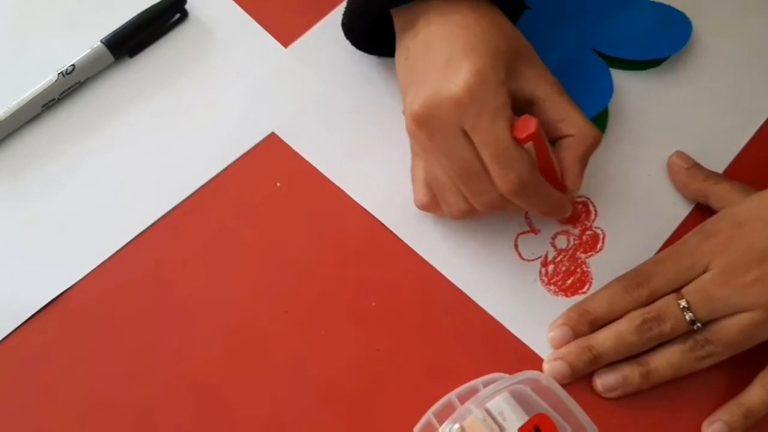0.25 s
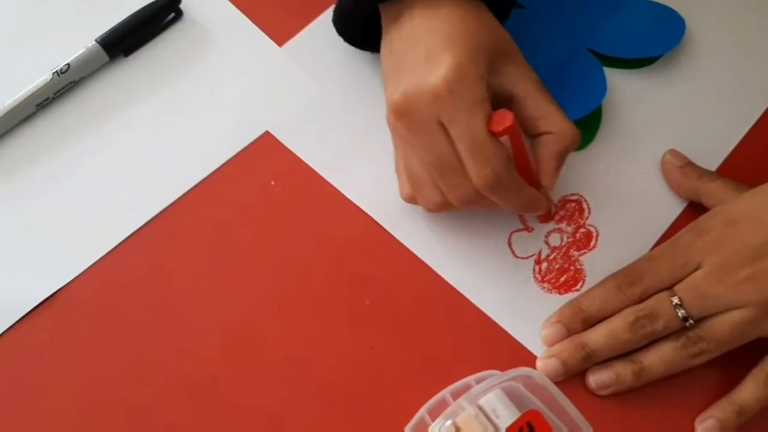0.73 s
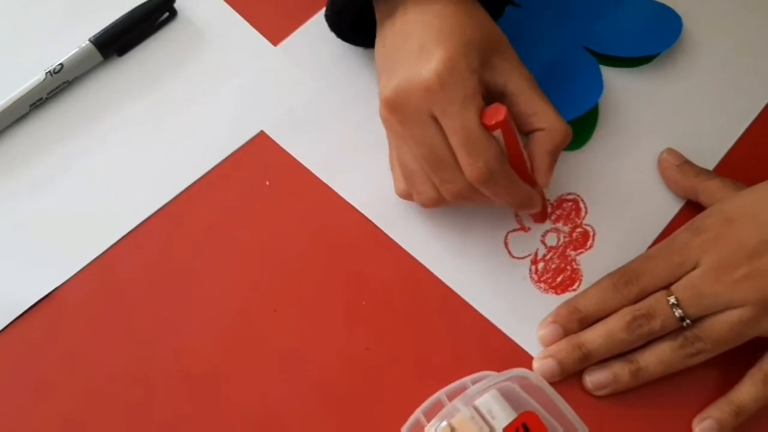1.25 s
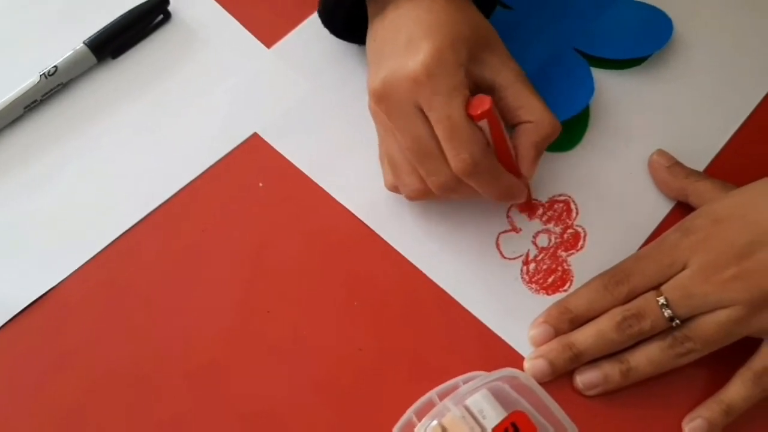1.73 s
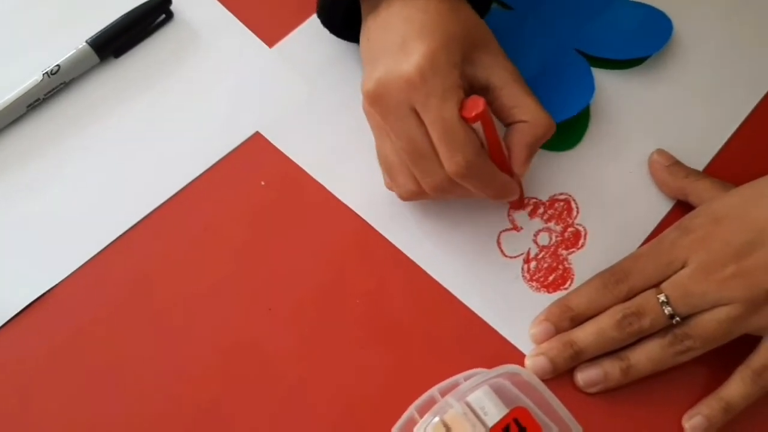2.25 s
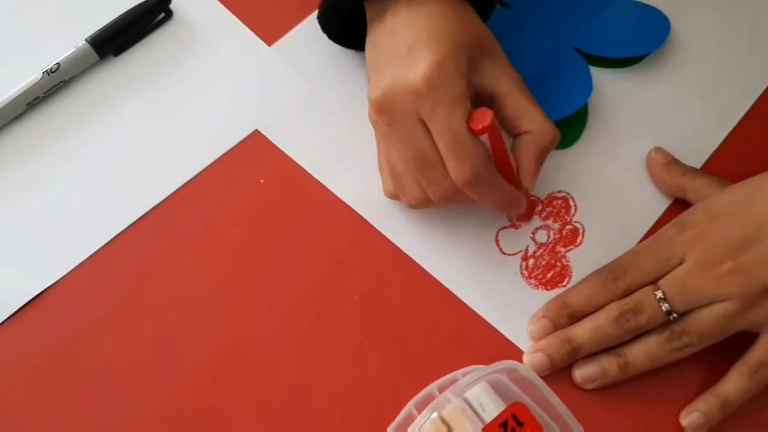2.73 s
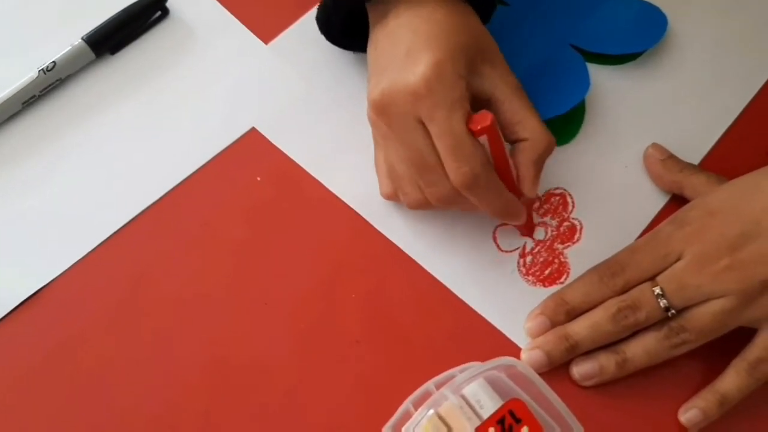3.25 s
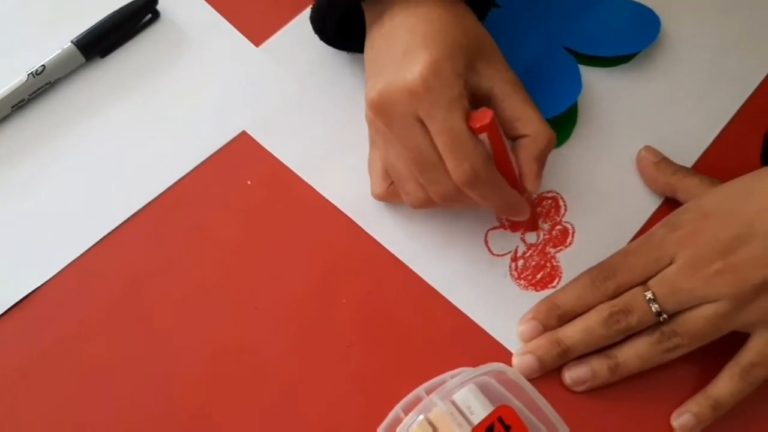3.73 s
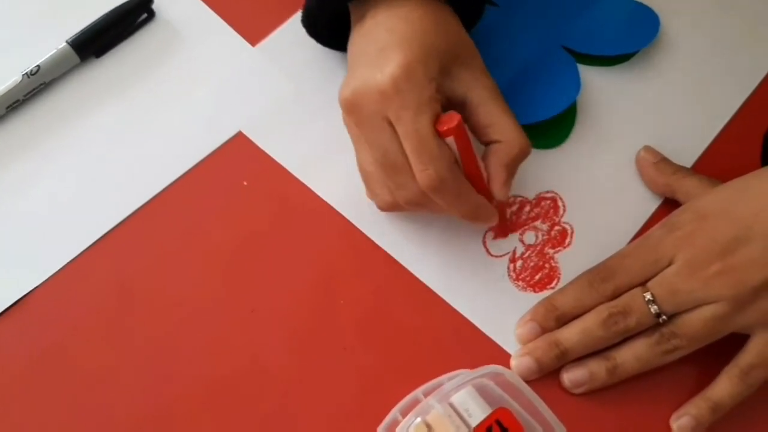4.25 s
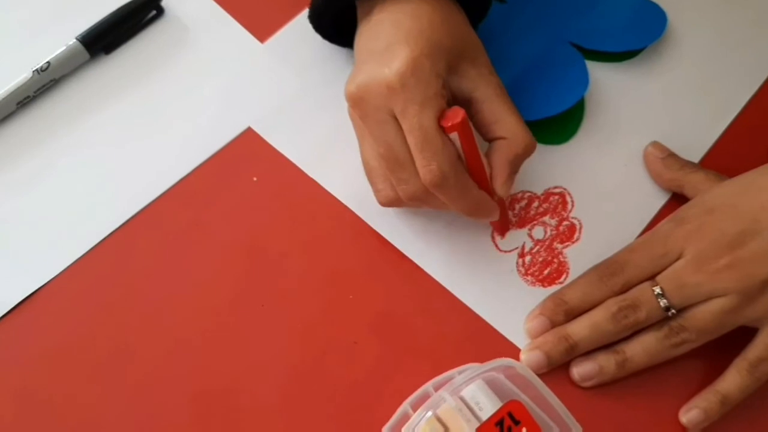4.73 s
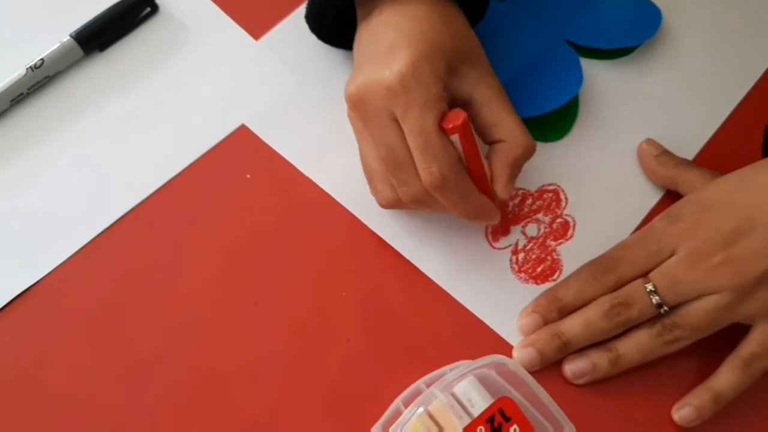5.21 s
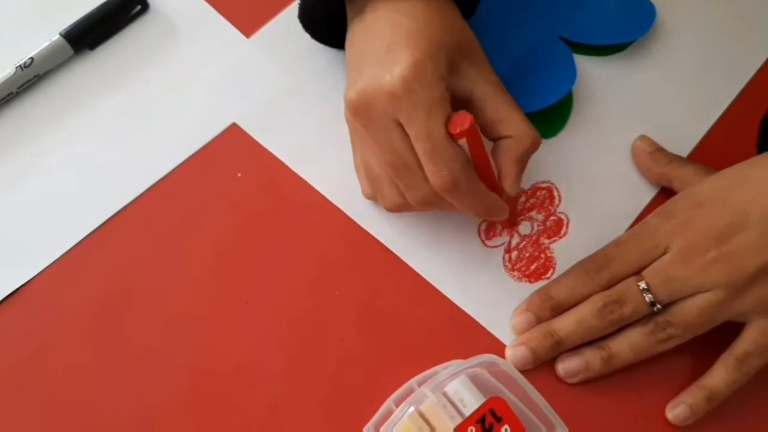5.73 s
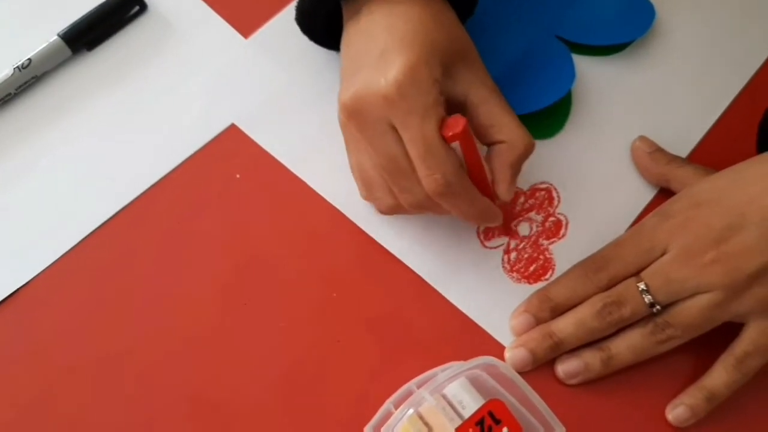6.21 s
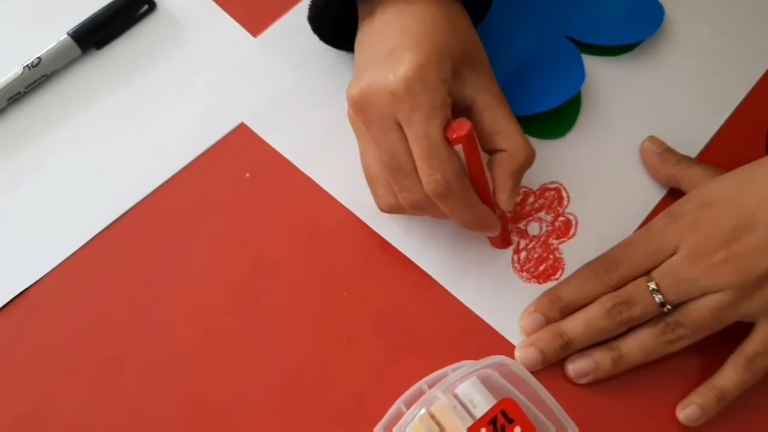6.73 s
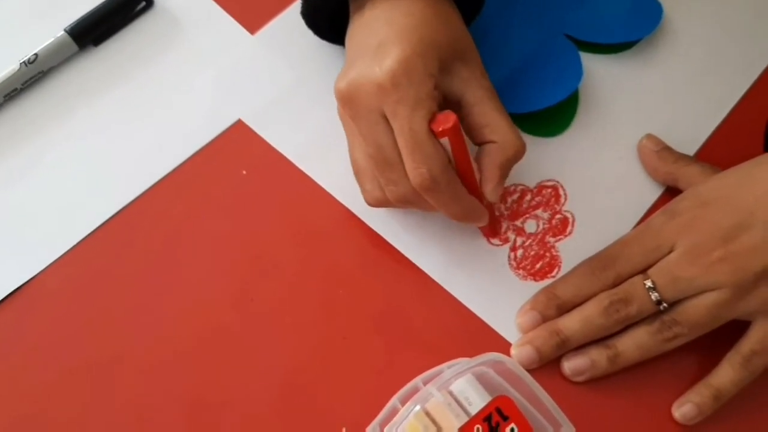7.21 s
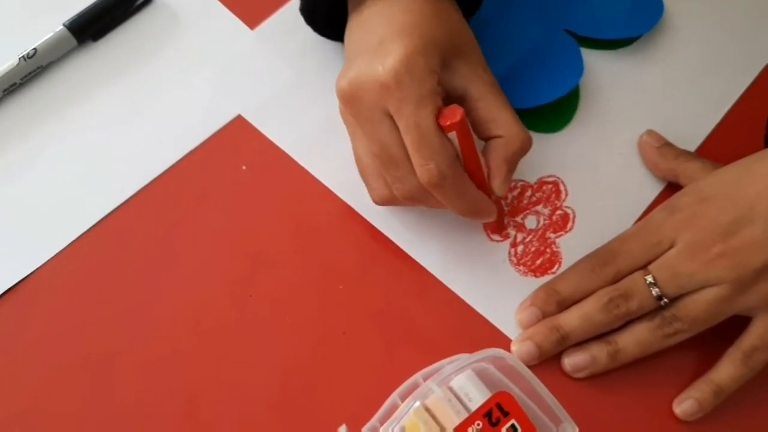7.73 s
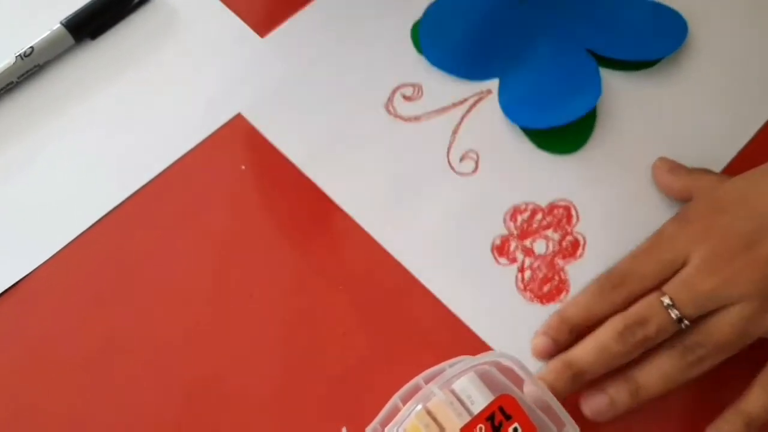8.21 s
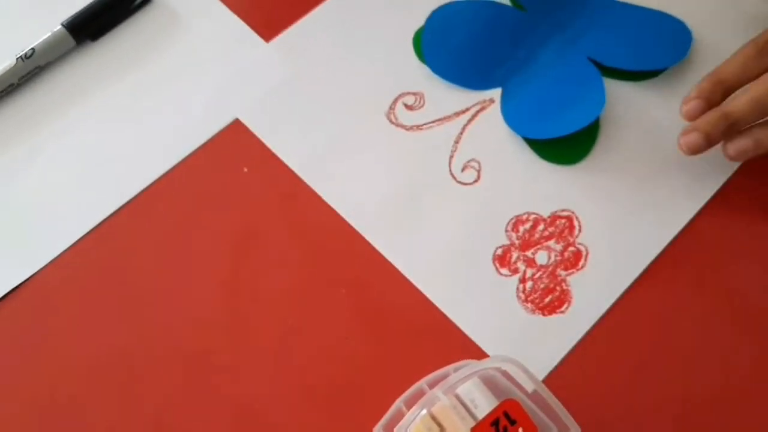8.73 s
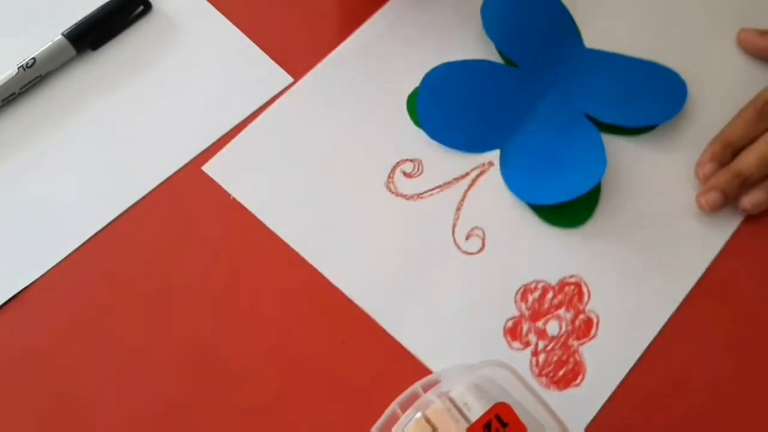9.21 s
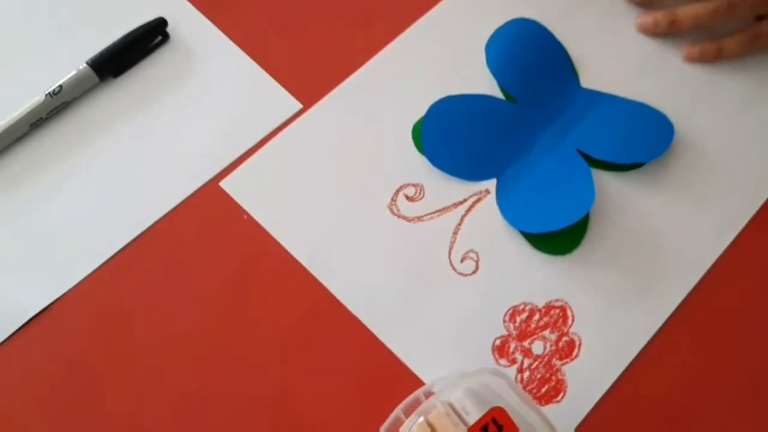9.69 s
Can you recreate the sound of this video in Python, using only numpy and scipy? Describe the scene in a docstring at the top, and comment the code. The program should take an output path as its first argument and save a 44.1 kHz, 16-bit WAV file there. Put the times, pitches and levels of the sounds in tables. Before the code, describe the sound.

Close stereo pickup at a table in a small room: fast, grainy crayon rasping in bouts, with faint squeaky skids and soft hand rubbing. Then the hand brushes off the sheet, paper swishes hollowly, and a single hard object clicks sharply on the right with a short room echo. Beneath it, dull traffic rumble, faint hiss and a low engine drone that swells late.

```python
'''A wax crayon fills in a small flower on paper, about nine strokes a second, on a table in a small room:
noise and resonances swell with each stroke, and random ticks are specks of wax snapping off.
The drawing hand rubs on the sheet and brushes off it; the sheet slides with a hollow swish (noise bands),
and something hard clicks once on the table (decaying tones and echoes). Outside, an engine hums
(four sine waves) and grows louder over dull traffic noise; a faint hiss stays throughout.'''
import sys
import numpy as np
from scipy import signal
from scipy.fft import rfft, irfft, next_fast_len
from scipy.io import wavfile

SR = 44100
rng = np.random.default_rng(int(sys.argv[2]) if len(sys.argv) > 2 else 0)


def pcm_store(signal):
    """Save signal as 16-bit PCM."""
    levels = np.round(np.clip(np.atleast_2d(signal), -1, 1) * 32767)
    wavfile.write(sys.argv[1], SR, levels.astype(np.int16).T)


N = 439236
TIME = np.arange(N) / SR   # seconds
# spacing of the peaks left by reflections in the room, and close to the sheet
RIPPLE_STEP_HZ, SHEET_STEP_HZ = 69.84, 261
COLOUR_CHANGES_PER_S = 9   # how often the tip meets the paper a little differently
CATCHES_PER_S = 370   # how often sliding contacts catch on the fibres


def crayon(wax_db=2.5, crumb_db=-9.0, turn_speed=0.17, sharpness=0.82, tooth_db=0.86,
           ring_speed_follow=0.99, ring_force_follow=0.67, colour_db=2.5, rub_db=-0.86, rub_follow=0.1):
    """The tip is fast in mid stroke and slow at each turn; heavy strokes rasp, light ones still ring."""
    # Wax dragging over paper fibres. Each row: frequency in Hz, relative level in dB per Hz.
    wax_colour = [(1000, -1), (3100, 6.5), (4800, -4.5), (6800, -1.5), (8700, 3), (12300, -9.5),
                  (15000, -2.5)]
    # Resonances of crayon and sheet. Each row: frequency in Hz, width in Hz, relative level in dB,
    # left minus right in dB.
    tip_modes = [(1359, 55, 3, -6), (1824, 80, -0.5, -17), (2685, 250, 2.5, -13.5), (10220, 260, -5, 14),
                 (10810, 840, -6, 14)]
    # Hand rubbing on the sheet. Each row: frequency in Hz, relative level in dB per Hz.
    rub_colour = [(750, 0), (1280, 3.5), (2100, -2.5), (2600, -1), (3200, -6.5), (4800, -17),
                  (13000, -22.5)]
    # How hard the hand rubs. Each row: time in seconds, level in dB before the rub_db trim.
    pressure = [(.3, -67), (.7, -64), (1.0, -55.5), (1.45, -57.5), (1.65, -76.5), (1.93, -79), (2.1, -59.5),
                (2.7, -59.5), (3.5, -61.5), (3.8, -72), (5.2, -76), (5.6, -59), (6.0, -58.5), (6.3, -69)]

    s, stroke_db = strokes()
    # the stroke count is whole at full speed and halfway between at the turns
    stroke = np.interp(TIME, np.r_[0, s, 2 * s[-1] - s[-2]], np.arange(-1, len(s) + 1))
    swing = np.abs(np.cos(np.pi * stroke)) ** (2 * sharpness)
    speed = turn_speed + (1 - turn_speed) * swing
    on_paper = np.clip(2 * (len(s) - .3 - stroke), 0, 1)   # fades out after the last stroke
    usual_db = np.median(stroke_db)
    force = from_db(np.interp(TIME, s, stroke_db) - usual_db)
    tooth = from_db(tooth_db * drift(rate=240))   # the paper's grain makes the drag uneven

    wax = from_db(wax_db) * moving(wax_colour, ripple_db=2.5, rate=COLOUR_CHANGES_PER_S,
                                   step_hz=SHEET_STEP_HZ)
    crumb_gain = from_db(crumb_db + colour_db * drift(COLOUR_CHANGES_PER_S))
    rasp = force * speed * (wax + crumb_gain * crumbs(speed))

    ring = 0
    for hz, width_hz, db, side_db in tip_modes:
        gain = from_db(db + colour_db * drift(COLOUR_CHANGES_PER_S))
        ring = ring + gain * pan(side_db) * resonant_noise(hz, width_hz)
    ring = force ** ring_force_follow * speed ** ring_speed_follow * ring

    rub_gain = from_db(in_time(pressure)[0] + rub_db) * speed ** rub_follow
    rub = rub_gain * moving(rub_colour, ripple_db=6.5, rate=5)
    return on_paper * tooth * (from_db(usual_db) * (rasp + ring) + rub)


def strokes():
    """Time of full speed for each stroke in seconds, and its level in dB."""
    # Bouts of even back-and-forth scribbling. Each row: first stroke in seconds,
    # last stroke in seconds, number of strokes.
    bouts = [(.232, 1.891, 16), (2.012, 3.479, 14), (3.635, 3.815, 2), (3.932, 5.5, 14), (5.63, 6.085, 5),
             (6.32, 6.43, 2), (6.535, 7.093, 6)]
    # How heavy each stroke is, bout after bout. Each entry: level in dB.
    levels_db = [-80.5, -76.5, -74, -69, -74.5, -70, -70.5, -71, -73.5, -71, -67, -72, -69.5, -75.5, -72,
                 -75.5, -68.5, -71.5, -65.5, -66, -64.5, -68, -64.5, -67.5, -66, -67.5, -69, -71.5, -79,
                 -73, -72.5, -76, -72, -71.5, -74.5, -71.5, -79, -72, -76.5, -70.5, -69, -70, -69, -67,
                 -65.5, -67.5, -77, -68, -71, -72, -86, -85, -99, -71, -78, -77, -82, -78, -73.5]
    times = [np.linspace(first, last, count) for first, last, count in bouts]
    return np.concatenate(times), levels_db


def crumbs(speed, low_hz=3000, high_hz=14000, per_s=500, spread_db=3):
    """Specks of wax snap off on the fibres, more often when the tip is fast; rms 1."""
    sizes = from_db(spread_db * np.minimum(rng.exponential(1, N), 4)) * rng.choice([-1, 1], (2, N))
    snaps = sizes * (rng.random(N) < per_s * speed / SR)   # per_s holds at full speed
    band = signal.butter(1, [low_hz, high_hz], "band", fs=SR, output="sos")
    return rms_one(signal.sosfilt(band, snaps))


def scuffs(side_db=-5.0, catch_db=1.0):
    """Brief bright skids and squeaks: the tip catches and lets go unevenly."""
    # Short scuffs on the sheet. Each row: peak time in seconds, rise in seconds, fall in seconds,
    # level in dB, centre in Hz, ratio of band edge to centre.
    skids = [(.44, 0.032, 0.01, -63, 2780, 1.22), (2.655, .015, .025, -56.5, 1800, 1.4),
             (5.274, 0.012, 0.0076, -58.5, 5200, 1.6), (5.3365, .001, 0.0095, -55, 4380, 1.1),
             (5.339, .0015, 0.0089, -55, 5250, 1.07), (5.342, 0.0055, 0.015, -60, 7600, 1.16),
             (5.742, 0.013, 0.015, -57.5, 5450, 1.34), (7.857, 0.003, 0.023, -58.5, 11500, 1.34)]
    out = np.zeros((2, N))
    for s, rise, fall, db, hz, ratio in skids:
        # bell-shaped rise, then an exponential fall
        swell = np.exp(-np.where(TIME < s, ((TIME - s) / rise) ** 2, (TIME - s) / fall) / 2)
        out += from_db(db) * swell * band_noise(hz / ratio, hz * ratio, N)
    return out * pan(side_db) * from_db(catch_db * drift(CATCHES_PER_S))


def slide(grain_db=1.9, hollow_hz=1780, hollow_width_hz=520, hollow_side_db=-4.0,
          attack_s=0.1, release_s=0.084):
    """Paper gliding: fluttering hiss with small catches, over the sheet's hollow resonance."""
    # Sliding paper. Each row: frequency in Hz, relative level in dB per Hz.
    paper = [(1800, 0.5), (4800, 1.5), (6700, -4), (8700, 2), (10000, -4), (15000, -5.5)]
    # Hand and sheet slide over the table. Each row: start in seconds, length in seconds,
    # hiss level in dB, hollow resonance level in dB.
    pushes = [(7.58, 0.68, -78.5, -64.5), (7.845, .04, -59, -68), (8.718, 0.35, -58, -59),
              (9.3, 0.16, -69.5, -67), (9.5, 0.27, -73, -54.5)]
    swish = moving(paper, ripple_db=3.3, rate=16, step_hz=SHEET_STEP_HZ)
    low_hz, high_hz = hollow_hz - hollow_width_hz / 2, hollow_hz + hollow_width_hz / 2
    hollow = pan(hollow_side_db) * band_noise(low_hz, high_hz, N)
    out = 0
    for s, length, hiss_db, hollow_db in pushes:
        # each push builds before its start, holds for its length and dies away
        before, after = np.minimum(TIME - s, 0), np.maximum(TIME - s - length, 0)
        push = np.exp(before / attack_s - after / release_s)
        out = out + push * (from_db(hiss_db) * swish + from_db(hollow_db) * hollow)
    return out * from_db(grain_db * drift(CATCHES_PER_S))


def click(crack_db=-10.5, snap_db=-23.5, snap_s=0.001, room_db=-14.0,
          early_gain=0.85, early_s=0.011, build_s=0.0003, wall_s=0.0264, wall_gain=0.82,
          near_side_db=-14.5, shadow_hz=700, room_side_db=-3.0):
    """A hard contact: a pressure swing, the struck thing's ring, scatter off the table, wall echoes."""
    # A light touch, then the blow. Each row: start in seconds, strength in dB.
    touches = [(8.9905, -22), (8.9914, 0)]
    # What it rings with. Each row: frequency in Hz, level in dB, time to fall by 60 dB in seconds.
    ring_modes = [(437, -33, 0.097), (582, -31, 0.21), (810, -31, 0.25), (1260, -34.5, 0.41),
                  (1495, -27.5, 0.24), (1593, -31, 0.3), (1863, -31, 0.25), (2500, -7.5, 0.018),
                  (3180, -14.5, 0.013), (7360, -47.5, 0.22), (11200, -45, 0.14), (11250, -19, 0.009)]
    t = np.arange(SR) / SR
    swing = (t - .0005) / .00013
    after = np.maximum(t - .0005, 0)   # seconds since contact
    direct = from_db(crack_db) * swing * np.exp((1 - swing ** 2) / 2)
    for hz, db, t60 in ring_modes:
        direct = direct + from_db(db - 60 * after / t60) * np.sin(2 * np.pi * hz * after)
    snap = (after > 0) * np.exp(-after / snap_s) * rng.standard_normal(len(t))
    direct = direct + from_db(snap_db) * snap   # the rough edges snap

    # only the bass bends round to the left, which hears it later
    bass = signal.sosfilt(signal.butter(1, shadow_hz, fs=SR, output="sos"), direct)
    left, right = bass + (direct - bass) * pan(near_side_db)
    near = np.array([np.interp(t - .00016, t, left, left=0), right])

    early = early_gain * np.exp(-after / early_s)
    walls = wall_gain * np.exp(-((t - wall_s) / 0.0033) ** 2)   # a bunch of wall echoes
    scatter = (1 - np.exp(-after / build_s)) * (1 + early + walls)
    blow = near + from_db(room_db) * scatter * room_tail(t) * pan(room_side_db)
    out = 0
    for s, db in touches:
        placed = [np.interp(TIME - s, t, port, left=0, right=0) for port in blow]
        out = out + from_db(db) * np.array(placed)
    return out


def room_tail(t):
    """Diffuse sound that dies at its own rate in each third of an octave."""
    # The room's answer to the click. Each row: frequency in Hz, relative level in dB per Hz,
    # time to fall by 60 dB in seconds.
    room = [(250, 1, 0.18), (483, 7.5, 0.29), (970, 0.5, 0.33), (1500, 3.5, 0.35), (2460, -1, 0.43),
            (3880, -10, 0.35), (5170, -27, 0.25), (15000, -23.5, 0.32)]
    edges = np.geomspace(180, 17000, 21)   # Hz
    tail = 0
    for low, high in zip(edges, edges[1:]):
        db, t60 = at_hz(room, np.sqrt(low * high))
        band = np.sqrt((high - low) / SR) * band_noise(low, high, len(t))
        tail = tail + from_db(db - 60 * t / t60) * band
    return tail


def engine(third_db=-9.5, waver=0.0017, flutter_db=2.0):
    """Only the four lowest harmonics of the firing rate come through the walls, each fading on its own."""
    # Engine speed. Each row: time in seconds, firings per second.
    firing = [(0, 56), (2.2, 57.4), (4.0, 55.2), (4.7, 57.3), (5.6, 57), (6.9, 56.6), (8.3, 54.4),
              (9.96, 56.3)]
    # Strength of the first, second and fourth harmonics. Each row: time in seconds, level in dB.
    fundamental = [(3.9, -62.5), (5.7, -57), (6.2, -48), (7.56, -52.5), (8.9, -41.5), (9.3, -51),
                   (9.96, -49)]
    second_harmonic = [(1.55, -57.5), (2.0, -50), (4.55, -64.5), (4.85, -49), (5.9, -59.5), (7.3, -52),
                       (7.52, -40), (8.2, -35), (8.86, -45.5), (9.1, -34.5), (9.33, -43), (9.6, -36.5),
                       (9.96, -40)]
    fourth_harmonic = [(4.0, -62), (4.2, -49.5), (4.6, -46.5), (5.15, -53), (5.64, -42.5), (6.08, -50),
                       (6.35, -42), (7.02, -40), (7.2, -53.5), (7.75, -42), (8.4, -38.5), (8.72, -55.5),
                       (8.98, -39.5), (9.65, -58.5), (9.92, -38.5)]
    tables = (firing, fundamental, second_harmonic, fourth_harmonic)
    rate, first, second, fourth = [in_time(rows)[0] for rows in tables]
    phase = 2 * np.pi * np.cumsum(rate * (1 + waver * drift(rate=14))) / SR
    levels = [first, second, fourth + third_db, fourth]   # the third follows the fourth
    sides_db = [1.5, 5.5, 3.0, 0.5]
    out = 0
    for k, (db, side_db) in enumerate(zip(levels, sides_db), start=1):
        tone = np.sin(k * phase + rng.uniform(0, 2 * np.pi))
        out = out + pan(side_db) * from_db(db + flutter_db * drift(rate=18)) * tone
    return out


def traffic(rumble_db=-49.5, rumble_follow=0.54, road_db=3.0, mode_db=-9.0, mode_follow=2.04,
            mode_hz=547, mode_width_hz=115, boom_low_hz=44, boom_high_hz=52):
    """As the street gets louder the rumble grows a little and the room's resonance a lot."""
    # Low rumble, then the rush. Each row: frequency in Hz, relative level in dB per Hz.
    rumble_colour = [(45, -11.5), (70, -3.5), (85, -5.5), (129, -8.5), (147, 1), (183, -11), (200, -1.5),
                     (240, 0.5), (330, -8.5), (480, -15.5), (620, -24.5), (2000, -65)]
    road_colour = [(680, 0.5), (1300, 1.5), (1900, 0), (3600, -14), (5200, -24), (8200, -23),
                   (12000, -34.5)]
    # Rush of the street. Each row: time in seconds, level in dB before the road_db trim.
    rush_levels = [(0, -64), (.35, -71), (1.15, -65.5), (3.9, -67), (5.6, -61.5), (6.6, -62.5), (7.86, -55),
                   (8.55, -58), (8.9, -55.5), (9.55, -56), (9.96, -56)]
    # Deep boom of the traffic. Each row: time in seconds, level in dB.
    boom_levels = [(.5, -77), (1.1, -53.5), (1.7, -66), (2.8, -57), (3.06, -46.5), (3.4, -66.5), (8.9, -55)]
    rush, boom = in_time(rush_levels)[0], in_time(boom_levels)[0]
    usual = rush.mean()
    louder_db = rush - usual
    rumble = from_db(rumble_db + rumble_follow * louder_db) * diffuse(rumble_colour)
    road = from_db(rush + road_db) * moving(road_colour, ripple_db=3.5, rate=2)
    # a room resonance that the traffic stirs
    stirred = band_noise(mode_hz - mode_width_hz / 2, mode_hz + mode_width_hz / 2, N)
    stirred = from_db(usual + mode_db + mode_follow * louder_db) * stirred
    deep = from_db(boom) * band_noise(boom_low_hz, boom_high_hz, N)[0]   # same on both sides
    return rumble + road + deep + stirred


def hiss(level_db=-77):
    """The quiet room's faint steady hiss, as shaped noise."""
    # Hiss. Each row: frequency in Hz, relative level in dB per Hz.
    hiss_colour = [(1800, 10), (5000, -9), (8400, -1), (15000, -2)]
    return from_db(level_db) * diffuse(hiss_colour)


def moving(rows, ripple_db, rate, step_hz=RIPPLE_STEP_HZ, count=5):
    """Diffuse noise of a moving source: it glides between several patterns of reflections; rms 1."""
    shares = np.array([drift(rate) ** 2 for _ in range(count)])
    shares = shares / np.linalg.norm(shares, axis=0)
    return sum(share * diffuse(rows, ripple_db, step_hz) for share in shares)


def diffuse(rows, ripple_db=0.0, step_hz=RIPPLE_STEP_HZ, spacing_m=0.17, sharp_peaks=66):
    """Noise from all sides at two spaced ports: alike in the bass, unrelated in the treble; rms 1."""
    # How the two ports weigh sound around them. Each row: frequency in Hz, left minus right in dB.
    port_balance = [(300, 0), (750, -0.5), (1300, -3), (2500, -7.5), (4300, -5), (7500, 3.5), (15000, 0)]
    size = next_fast_len(N)
    hz = np.maximum(np.fft.rfftfreq(size, 1 / SR), 1)
    level_db, side_db = at_hz(rows, hz)[0], at_hz(port_balance, hz)[0]
    # reflections leave narrow peaks and dips in the spectrum; the higher ones blur
    peaks_hz = np.arange(400) * step_hz
    ripple = np.interp(hz, peaks_hz, rng.standard_normal(len(peaks_hz)))
    level_db = level_db + ripple_db / (1 + (hz / step_hz / sharp_peaks) ** 2) * ripple
    alike = .96 * np.sinc(2 * hz * spacing_m / 343)   # sound travels 343 m/s
    mid, side = rfft(rng.standard_normal((2, size)))
    ports = np.sqrt(1 + alike) * mid + np.sqrt(1 - alike) * side * [[1], [-1]]
    skirt = np.minimum(hz / rows[0][0], 1) ** 2   # fades below the first row's frequency
    return rms_one(irfft(ports * from_db(level_db) * pan(side_db) * skirt, size)[:, :N])


def resonant_noise(hz, width_hz, wander=0.012):
    """Countless tiny slips feed one resonance, its pitch shifting as the contact moves; rms 1."""
    edges = [hz - width_hz / 2, hz + width_hz / 2]
    band = signal.butter(1, edges, "band", fs=SR, output="sos")
    ring = signal.sosfilt(band, rng.standard_normal((2, next_fast_len(N))))
    shift_hz = hz * wander * drift(COLOUR_CHANGES_PER_S)
    shift = np.exp(2j * np.pi * np.cumsum(shift_hz) / SR)
    return rms_one((signal.hilbert(ring)[:, :N] * shift).real)


def band_noise(low_hz, high_hz, size):
    """Stereo noise between two edges; rms 1."""
    band = signal.butter(2, [low_hz, high_hz], "band", fs=SR, output="sos")
    return rms_one(signal.sosfilt(band, rng.standard_normal((2, size))))


def drift(rate):
    """Slow random wander of rms 1, with `rate` new values a second."""
    count = int(rate * N / SR) + 2
    values = rng.standard_normal(count)
    return rms_one(np.interp(np.linspace(0, count - 1, N), np.arange(count), values))


def pan(side_db):
    """Left and right gains of constant power, from left minus right in dB."""
    gains = from_db(np.array([[.5], [-.5]]) * side_db)
    return gains / np.sqrt(np.mean(gains ** 2, axis=0))


def in_time(rows):
    """One curve per column, joined by straight lines."""
    s, *columns = np.transpose(rows)
    return [np.interp(TIME, s, c) for c in columns]


def at_hz(rows, hz):
    """Each column read on a log-frequency axis."""
    points, *columns = np.transpose(rows)
    return [np.interp(np.log(hz), np.log(points), c) for c in columns]


def from_db(db):
    """Decibels to gain."""
    return 10 ** (np.asarray(db) / 20)


def rms_one(x):
    """Scale to unit rms."""
    return x / np.sqrt(np.mean(x ** 2) + 1e-20)


def scene():
    """Drawing close by, traffic beyond the walls."""
    return crayon() + scuffs() + slide() + click() + engine() + traffic() + hiss()


def record(dry, cutoff_hz=15750):
    """The highest peaks are rounded and the top is cut steeply."""
    rounded = .7 * np.tanh(dry / .7)
    return signal.sosfilt(signal.ellip(12, .1, 70, cutoff_hz, fs=SR, output="sos"), rounded)


dry = scene()
out = record(dry)
pcm_store(out)
```